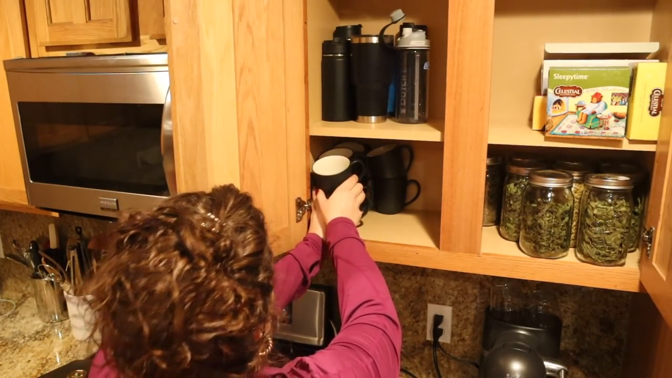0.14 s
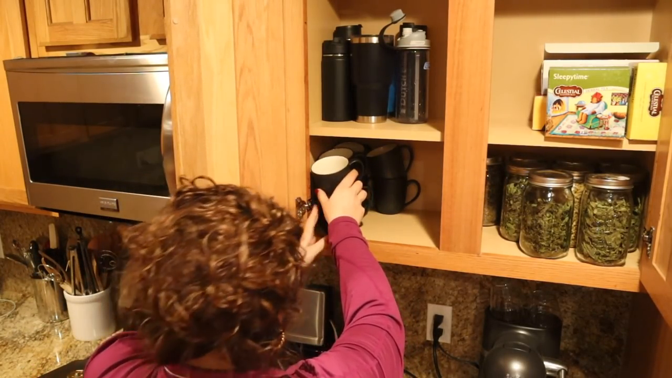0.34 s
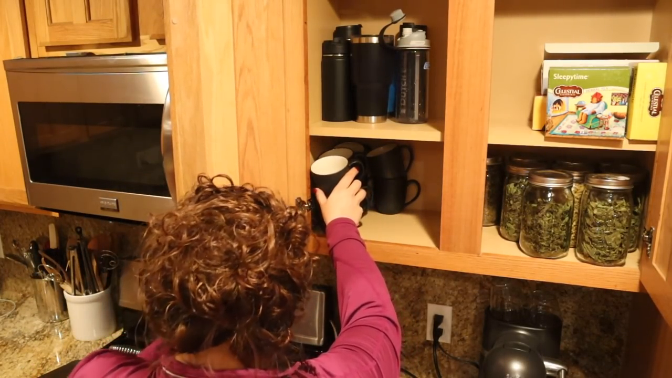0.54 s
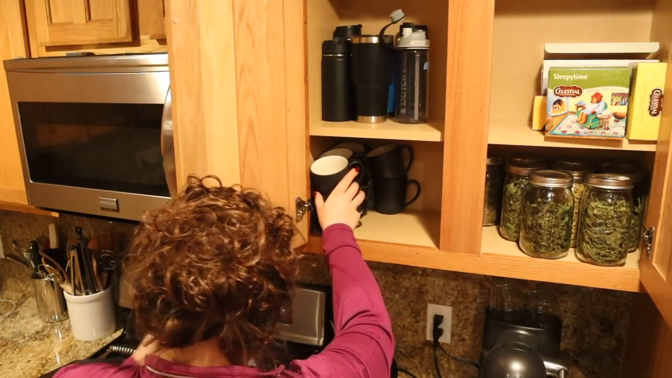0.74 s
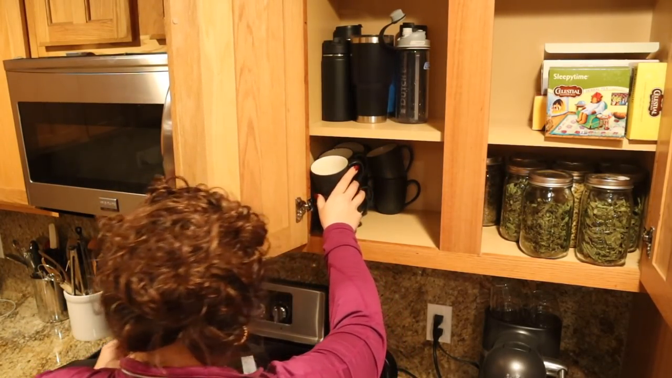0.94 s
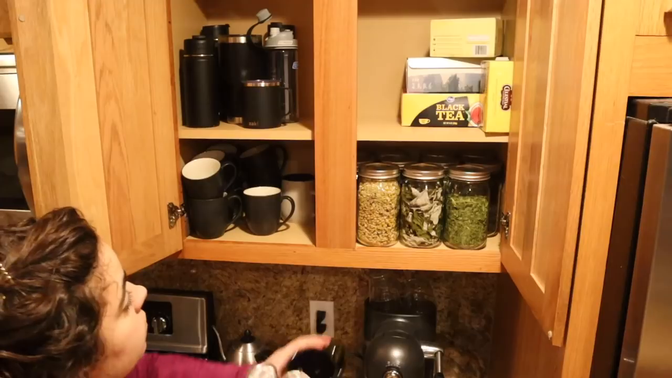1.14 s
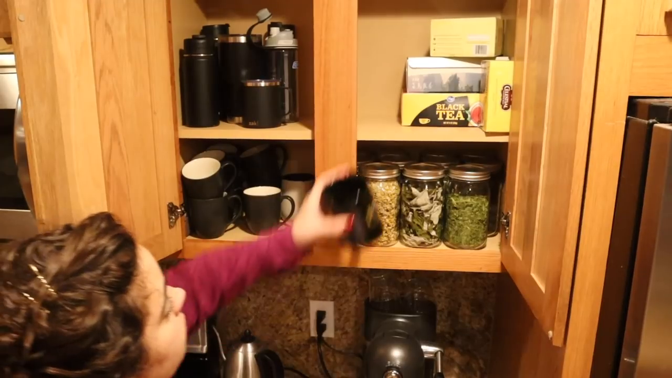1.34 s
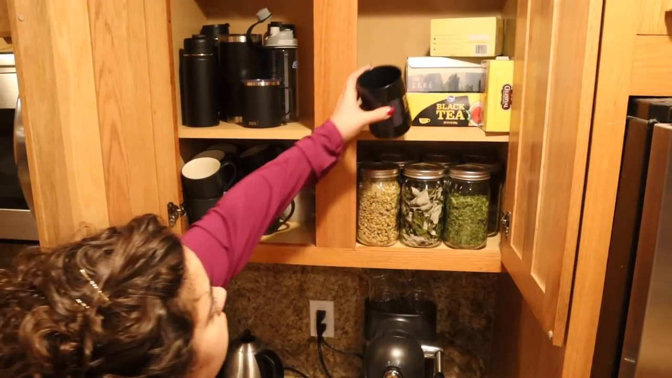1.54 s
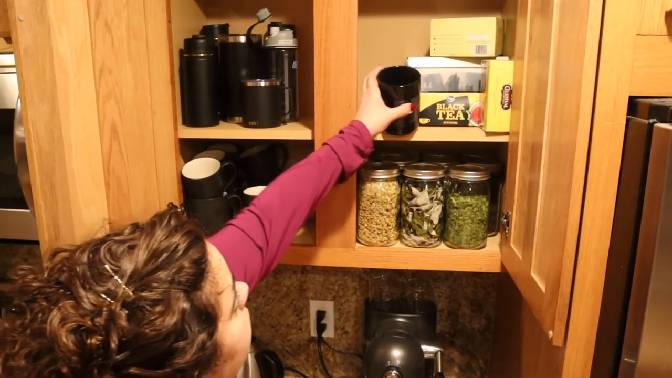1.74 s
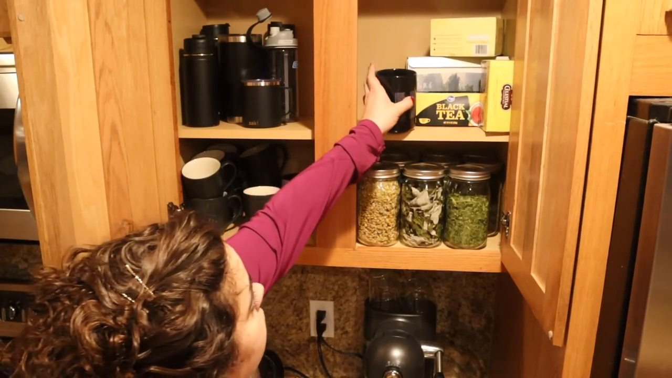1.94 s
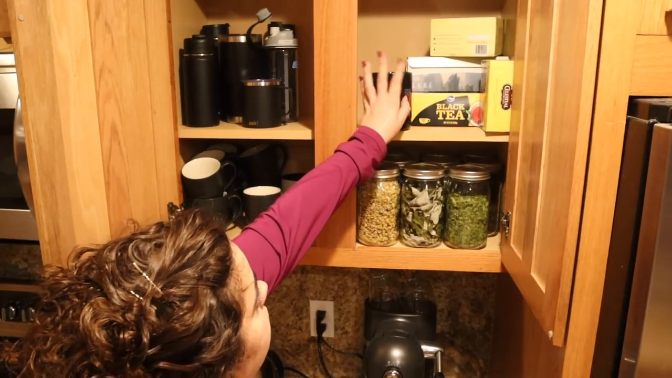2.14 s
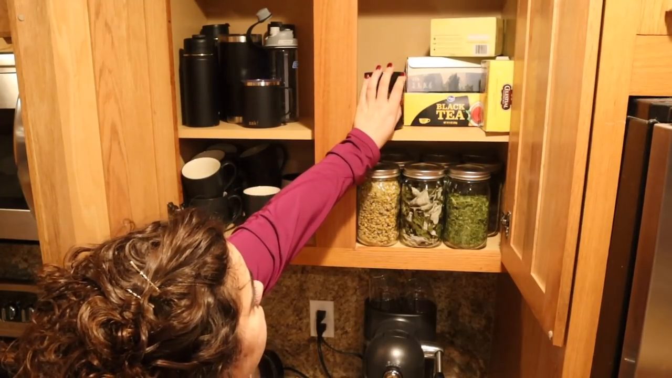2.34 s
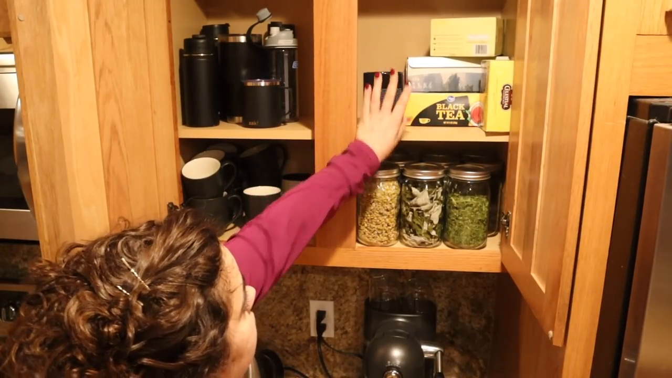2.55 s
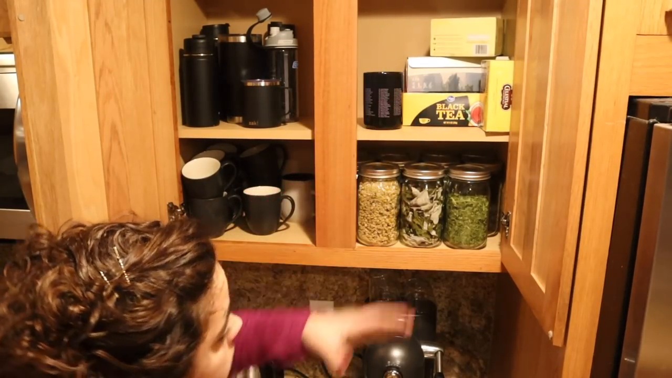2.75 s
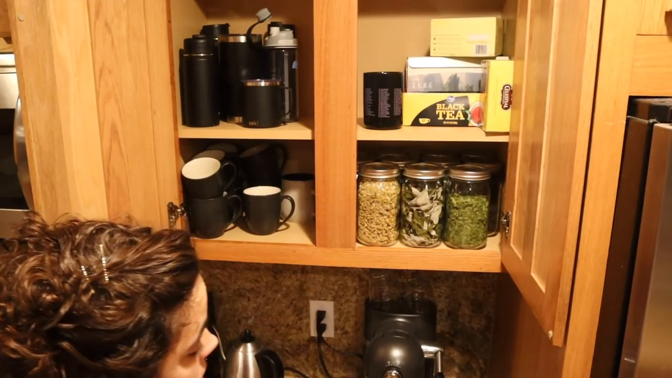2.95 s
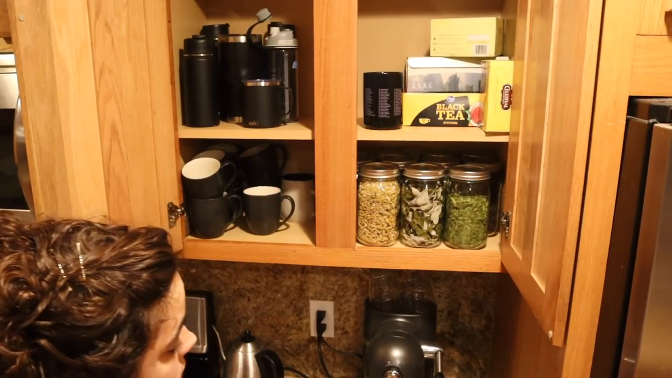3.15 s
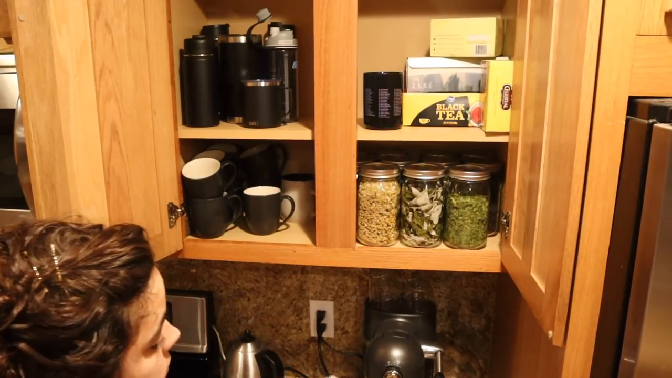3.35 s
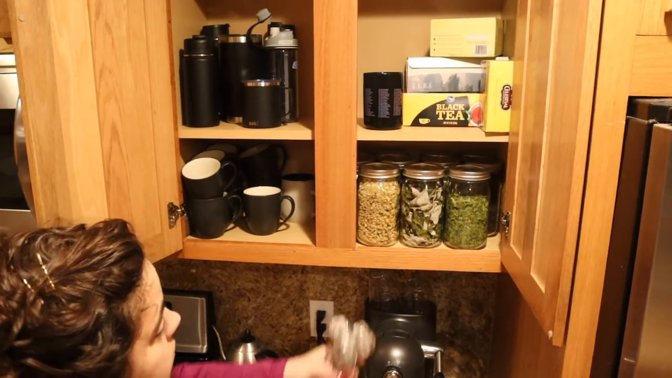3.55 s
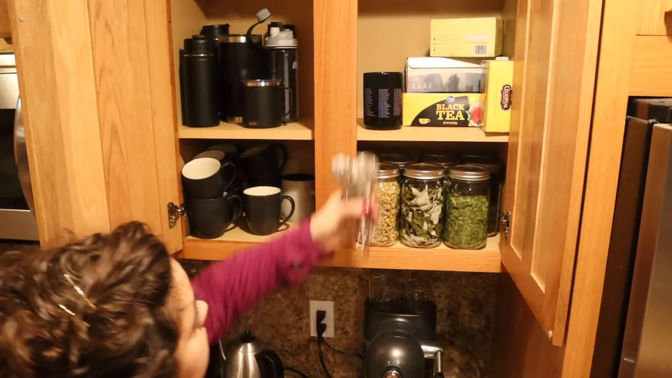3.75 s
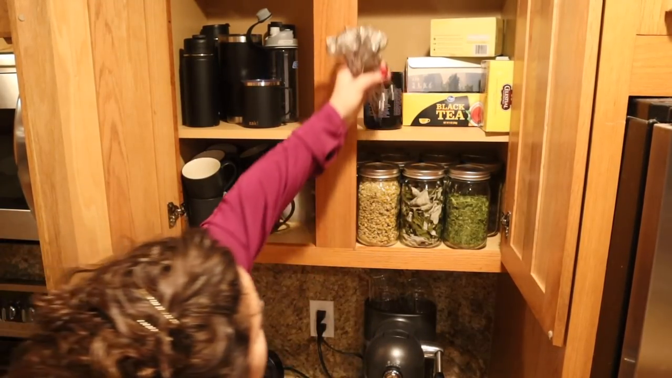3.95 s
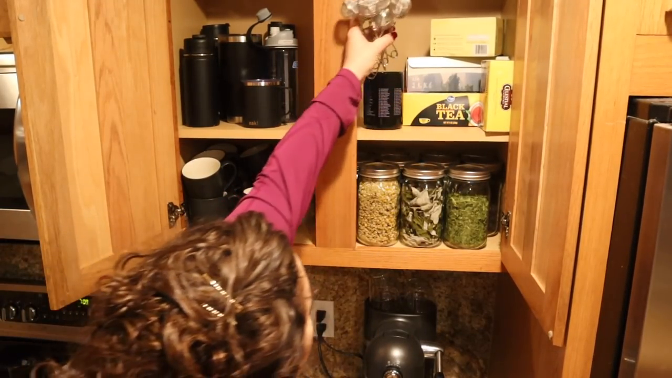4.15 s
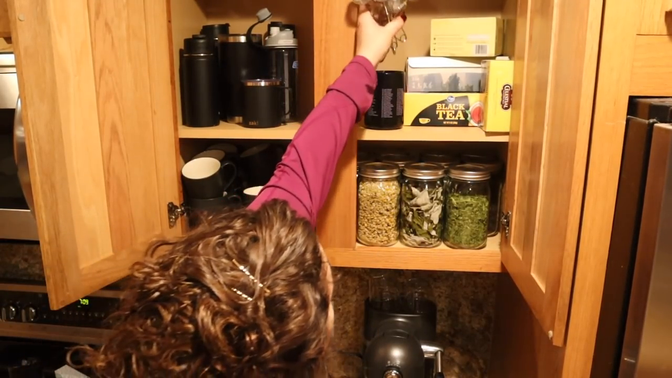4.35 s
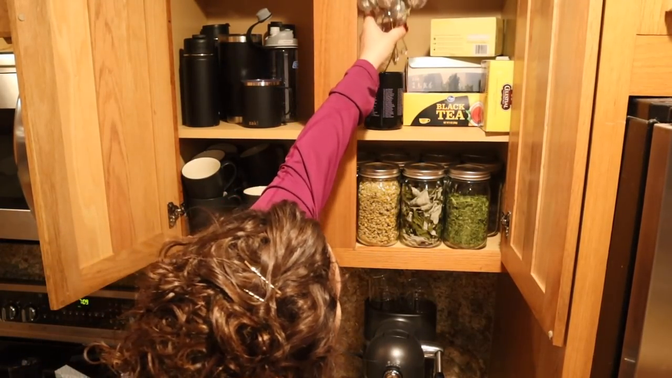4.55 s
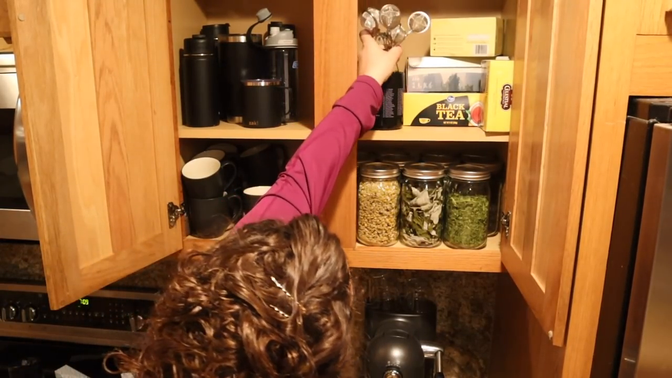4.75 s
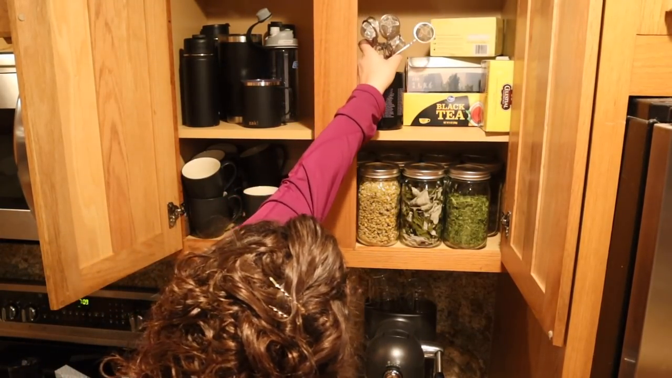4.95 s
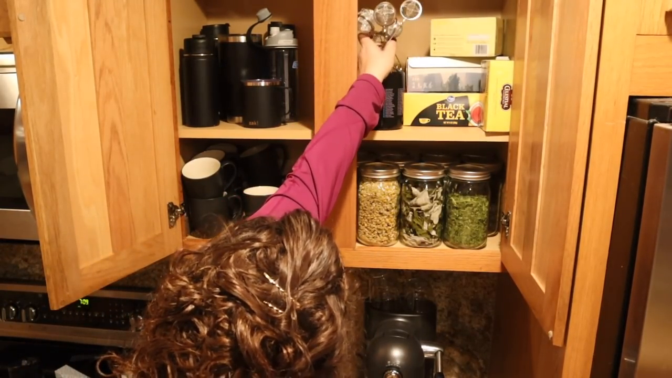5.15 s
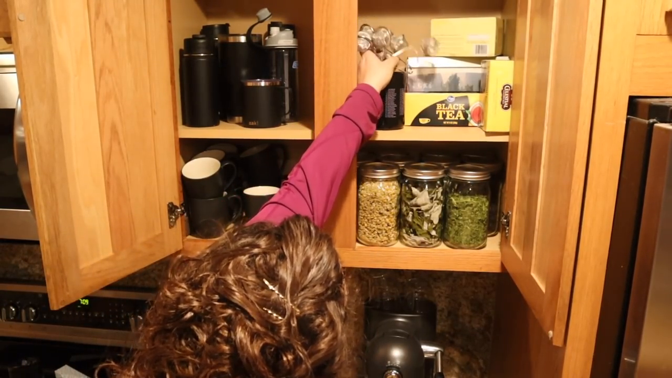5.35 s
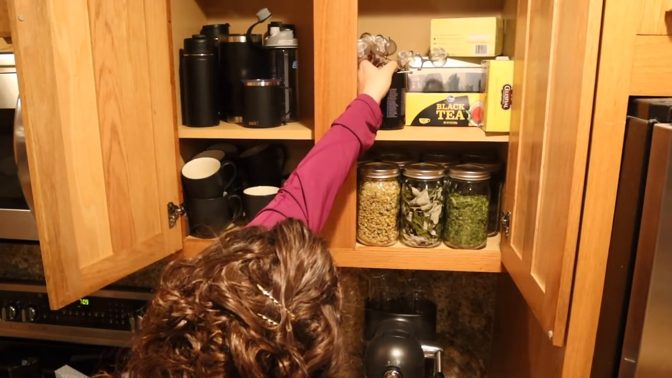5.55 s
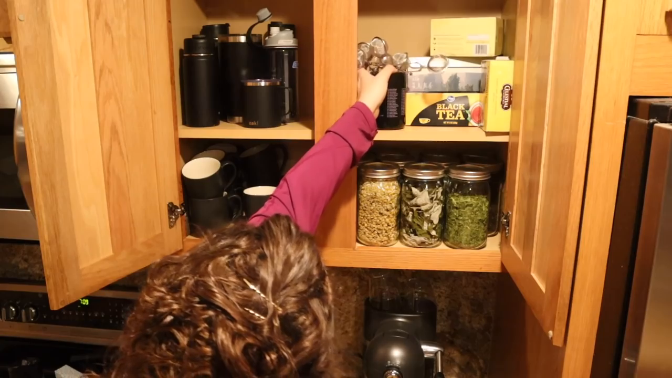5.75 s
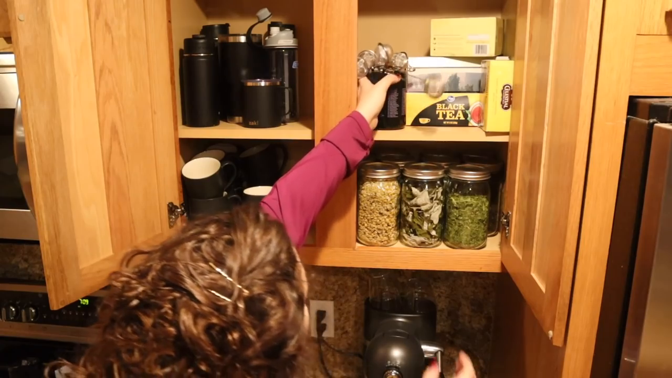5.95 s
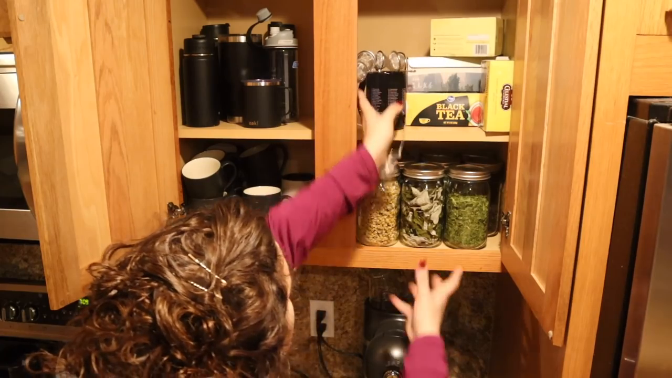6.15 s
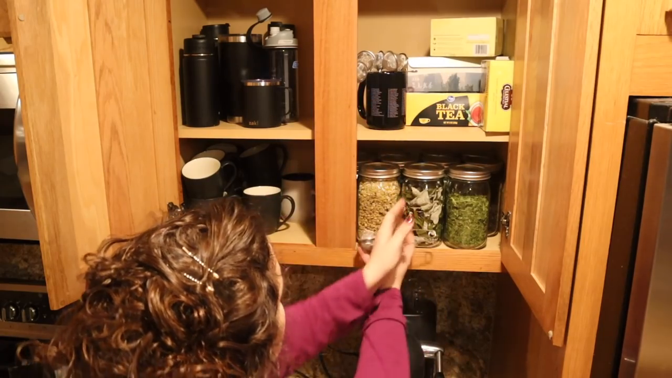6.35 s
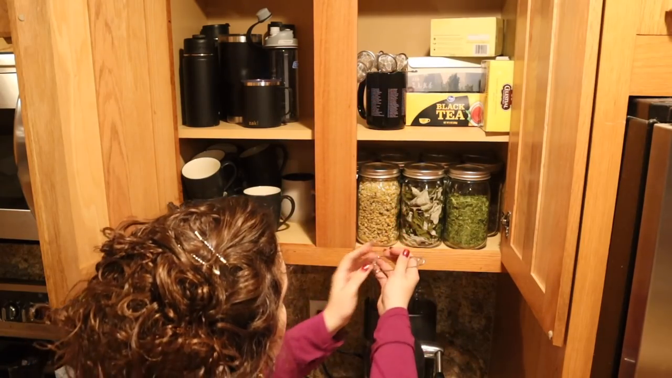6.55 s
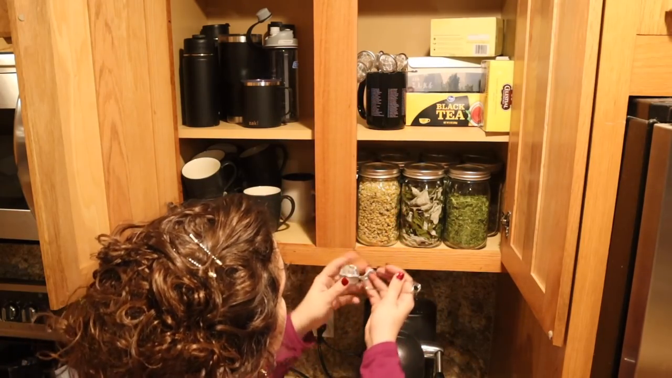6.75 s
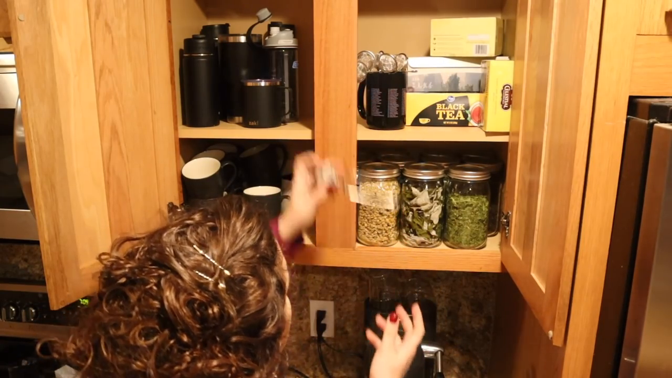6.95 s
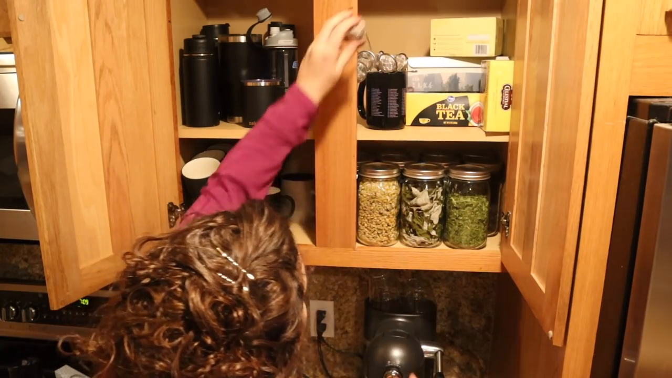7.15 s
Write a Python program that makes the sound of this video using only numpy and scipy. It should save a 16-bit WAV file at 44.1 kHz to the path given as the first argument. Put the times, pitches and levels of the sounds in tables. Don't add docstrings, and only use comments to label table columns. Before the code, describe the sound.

A close stereo pickup, cupboard slightly left, in a modest live kitchen with soft air noise and low wavering refrigerator hum throughout. From 0 to 0.25 s stoneware mugs tick, clash and grind rim on rim, ringing brightly; faint damped taps follow at 0.45-0.6. Near-quiet until a dull cloth sweep at 1.16 and light sleeve rustle. At 1.8 a cup knocks sharply on the wooden shelf, again hardest at 2.05, then slides with a scratchy rub around 2.3-2.4. Cloth rustles from 2.8, crisper around 3-3.2, then softly on. At 4.2 steel strainer handles drop hollowly into the cup, with strong paired wood knocks at 4.37 and 4.43. Sparse clinks from 4.75 grow into dense jingling, dragging and mesh brushing from 5.3, strongest around 6-6.2 with a bright clink and short scrape. Light ticks fade by 6.7, leaving slight rustle and hum to about 7.2.

```python
import sys
import numpy as np
from scipy import signal
from scipy.fft import rfft, irfft, next_fast_len
from scipy.io import wavfile

SR = 44100
rng = np.random.default_rng(int(sys.argv[2]) if len(sys.argv) > 2 else 0)


def elevation(decibels):
    levels = np.asarray(decibels, float)
    return 10 ** (levels / 20)


def to_wav(s):
    ch = np.atleast_2d(s).T
    pcm = np.round(np.clip(ch, -1, 1) * 32767)
    wavfile.write(sys.argv[1], SR, pcm.astype(np.int16))


N = 317520

# [t/s, level/dB]
SHUFFLING = [(4.19, -74), (4.7, -64), (4.846, -60), (5.2, -57.5), (5.36, -44), (5.866, -41.5),
             (6.138, -39.5), (6.5, -55.5), (6.6, -84)]
# [f/Hz, level/dB per Hz]
WOOD_CRACK = [(50, -51), (175, -17.5), (260, -4), (1000, 1), (1500, -3), (2000, -12.5), (3000, -17.5),
              (4000, -22), (5500, -34.5), (8500, -47), (15000, -92)]


def rms_one(x):
    return x / np.sqrt(np.mean(x ** 2) + 1e-20)


def gain_curve(rows):
    return elevation(np.interp(np.arange(N) / SR, *np.transpose(rows), -200, -200))


def swells(rows, rise_db_per_s, fall_db_per_s):
    t = np.arange(N) / SR
    db = np.full(N, -200.)
    for start, hold, top_db in rows:
        early = np.maximum(start - t, 0)
        late = np.maximum(t - start - hold, 0)
        db = np.maximum(db, top_db - rise_db_per_s * early - fall_db_per_s * late)
    return elevation(db)


def at_hz(points, hz):
    points = np.array(points)
    return np.interp(np.log(hz + 1), np.log(points[:, 0]), points[:, 1])


def body(spectrum, tilt_db=0, size=2048):
    hz = np.arange(size // 2 + 1) * SR / size
    db = at_hz(spectrum, hz) + tilt_db * np.log2((hz + 50) / 1500)
    cepstrum = irfft(np.log(elevation(db)))
    cepstrum[1:size // 2] *= 2
    cepstrum[size // 2 + 1:] = 0
    response = irfft(np.exp(rfft(cepstrum)))
    return response / np.sqrt(np.sum(response ** 2))


def ring(clicks, hz, t60):
    r = elevation(-60 / (np.clip(t60, 0.01, 0.8) * SR))
    w = 2 * np.pi * hz / SR
    return signal.lfilter([0, np.sin(w)], [1, -2 * r * np.cos(w), r * r], clicks + 1e-18)


def grains(per_s, spread_db):
    sizes = elevation(spread_db * np.minimum(rng.exponential(1, N), 5)) * rng.choice([-1, 1], N)
    return rms_one(sizes * (rng.random(N) < per_s / SR))


def rub(gain, spectrum, per_s, spread_db):
    return gain * signal.fftconvolve(grains(per_s, spread_db), body(spectrum))[:N]


def touching(hits, contact_ms):
    return [(s, db, tilt_db, contact_ms, hz, own_db) for s, db, tilt_db, hz, own_db in hits]


def tuned(hz, levels):
    return [(f, db, t60) for f, (db, t60) in zip(hz, levels)]


def twins(modes, detune_percent, twin_db):
    return modes + [(hz * (1 + detune_percent / 100), db + twin_db, t60) for hz, db, t60 in modes]


def strike(hits, rubbing, modes, crack, ring_db, crack_db, uneven_db, own_t60, longest, fade=0.11, size=2000):
    t = np.arange(size) / SR
    out = np.zeros(N + 3 * size)
    first = round(hits[0][0] * SR)
    last = min(round(hits[-1][0] * SR) + SR // 2, N)
    feeds = np.zeros((len(modes), last - first + size))
    hz, mode_db, t60 = np.transpose(modes)
    for s, db, tilt_db, contact_ms, own_hz, own_db in hits:
        at = round(s * SR)
        contact = np.clip(contact_ms, 1, 25) / 1000
        chatter = rng.standard_normal(size) * (1 - np.exp(-t / 0.00017)) * np.exp(-(t / contact) ** 3)
        soft = signal.lfilter(*signal.butter(1, 1400, fs=SR), chatter)
        chatter = soft + (chatter - soft) * np.exp(-t / contact * fade)
        chatter /= np.sqrt(np.sum(chatter ** 2))

        luck = np.abs(np.exp(2j * np.pi * np.append(hz, own_hz)[:, None] * t) @ chatter)
        luck = np.maximum(luck, 0.5)
        gains = elevation(db + tilt_db * np.log2(hz / 1500) + uneven_db * rng.standard_normal(len(hz)))
        feeds[:, at - first:at - first + size] += (gains / luck[:-1])[:, None] * chatter

        snap = elevation(crack_db) * signal.fftconvolve(chatter, body(crack, tilt_db))
        note = ring(np.pad(chatter, (0, len(snap) - size)), own_hz, own_t60)
        out[at:at + len(snap)] += elevation(db) * (snap + elevation(own_db) * note / luck[-1])
    for feed, f, g, d in zip(feeds, hz, mode_db, t60):
        drive = feed[:last - first] + rubbing[first:last]
        out[first:last] += elevation(ring_db + g) * ring(drive, f, min(d, longest))
    return out[:N]


def diffuse(x, size):
    # [f/Hz, likeness 0-1]
    likeness = [(60, 0.73), (300, 0.63), (700, 0.27), (1500, 0.15), (4000, 0.031)]
    alike = np.clip(at_hz(likeness, np.arange(size // 2 + 1) * SR / size), 0, 1)
    mid, side = rfft(x, size) * np.sqrt([1 + alike, 1 - alike]) / np.sqrt(2)
    return np.array([mid + side, mid - side])


def room_tone():
    # [t/s, level/dB]
    tone_levels = [(0.0, -53), (0.06, -59), (0.3, -58.5), (0.9, -57), (1.13, -56.5), (1.17, -53),
                   (4.2, -54), (5.6, -52.5), (7.2, -53.5)]
    # [f/Hz, level/dB per Hz]
    air_colour = [(12, -76), (20, -44), (60, -5), (86, -13.5), (120, -8.5), (147, -11), (205, -7.5),
                  (257, -11.5), (596, -18), (667, -17.5), (725, -19), (14200, -35), (16300, -29)]
    # [f/Hz, level/dB rms]
    hum_lines = [(59.6, -64.5), (118.4, -62), (204.6, -67.5), (463.0, -74.5), (597.5, -70.5)]
    air = diffuse(rng.standard_normal((2, N)), N)
    air = air * elevation(at_hz(air_colour, np.arange(N // 2 + 1) * SR / N))
    gain = gain_curve(tone_levels)
    out = elevation(0.5) * gain * rms_one(irfft(air, N))
    for hz, db in hum_lines:
        steady = np.sin(2 * np.pi * hz * np.arange(N) / SR)
        waver = rms_one(ring(rng.standard_normal(N), hz, 1.0))
        out += elevation(db + 57) * gain * rms_one(steady + 1.1 * waver)
    return out


def kitchen(x):
    # [f/Hz, t60/s]
    decays = [(125, 0.6), (250, 0.56), (500, 0.46), (1000, 0.72), (2000, 0.72), (4000, 0.67), (8000, 0.38),
              (13000, 0.17)]
    t = np.arange(SR // 2 + SR // 4) / SR
    tail = 0
    for hz, t60 in decays:
        edges_hz = [hz / np.sqrt(2), min(hz * np.sqrt(2), 19000)]
        band = signal.butter(2, edges_hz, "band", fs=SR, output="sos")
        decay = elevation(-60 * t / t60) + elevation(7.5 - 60 * t / 0.061)
        tail = tail + signal.sosfilt(band, rng.standard_normal((2, len(t)))) * decay
    tail = tail * (1 - np.exp(-(t / 0.0059) ** 2))
    tail = tail / np.sqrt(np.sum(tail ** 2) / 2)
    size = next_fast_len(N + len(t))
    return irfft(diffuse(tail, size) * rfft(x, size), size)[:, :N]


def ports(x, lead_samples):
    # [f/Hz, level/dB]
    port_tilt = [(300, -2), (1500, -1.6), (4000, -0.3), (8000, 1), (13000, 8)]
    hz = np.arange(N // 2 + 1) * SR / N
    tilt = elevation(at_hz(port_tilt, hz) / 2)
    late = np.exp(-2j * np.pi * lead_samples * hz / SR)
    return irfft(rfft(x) * np.array([tilt, late / tilt]), N)


def sleeve():
    # [t/s, hold/s, level/dB]
    rustles = [(1.3, 0.21, -63.5), (1.5, 0.011, -57), (1.6, 0.15, -62.5), (2.5, .01, -66),
               (2.78, 0.14, -65.5), (2.955, 0.0037, -49.5), (3.03, 0.17, -55), (3.18, 0.0041, -46),
               (3.24, 0.02, -52.5), (3.37, 0.99, -66), (3.95, 0.19, -64), (6.55, 0.0081, -62),
               (6.69, .005, -67), (6.85, 0.42, -69.5)]
    # [t/s, hold/s, level/dB]
    reach = [
        (1.158, 0.056, -43),
    ]
    # [f/Hz, level/dB per Hz]
    cloth_colour = [(700, -9), (1700, -14), (3300, -3), (5500, -2), (9000, -5.5), (13000, -10),
                    (16000, -11.5)]
    cloth = rub(1, cloth_colour, 6000, 2.4)
    thick = signal.lfilter(*signal.butter(2, 4450, fs=SR), cloth)
    rise_db_per_s, fall_db_per_s = 502, 207
    light = swells(rustles, rise_db_per_s, fall_db_per_s)
    heavy = swells(reach, rise_db_per_s, fall_db_per_s)
    return light * cloth + heavy * thick


def shelf():
    # [t/s, peak level/dB, tilt/dB per octave, knocking thing's f/Hz, its share/dB]
    knock_hits = [(0.064, -13, 1, 728, 1), (0.56, -50.5, -7.5, 280, -9), (1.802, -13.5, 5, 348.5, -3),
                  (1.811, -11.5, -1, 595, -2), (1.819, -21, -4, 770, -1.5), (1.903, -20, -4, 612, -1),
                  (1.965, -38.5, -9, 280, -3), (2.049, -6, 1.5, 1006, -6.5), (2.142, -30.5, 0, 293, 6),
                  (2.062, -20.5, 2, 990, -1), (4.365, -10.5, 1, 288, -9), (4.374, -13.5, -0.5, 592, -4.5),
                  (4.428, -8.5, 1, 289, -5.5), (4.436, -11, -0.5, 589, -2), (5.2, -47.5, -2.5, 690, 4),
                  (5.468, -38.5, -5, 1010, -3), (5.584, -38.5, -6.5, 640, 4), (5.761, -34, 0, 278, 4),
                  (6.009, -32, 3.5, 610, -32), (6.168, -28.5, 6, 765, 1), (6.435, -41.5, -5, 267, 2),
                  (6.688, -46.5, 9, 900, -2.5)]
    drop_hits = [
        (4.2005, -19.5, 2.2, 2100, -13),
        (4.2045, -20.5, 0.51, 834, -0.5),
    ]
    # [f/Hz, level/dB, t60/s]
    box_modes = [(110, -14.5, 0.067), (293, -1, 0.18), (378, -3, 0.063), (471, -9, 0.18), (584, -2, 0.3),
                 (770, -20, 0.13), (776, -0.5, 0.17), (890, -7, 0.11), (980, -34, 0.093), (1025, -10, 0.13),
                 (1070, -22, 0.11), (1220, -8.5, 0.14), (1330, -4, 0.2), (1460, -7, 0.16),
                 (1646, -14, 0.17)]
    # [f/Hz, level/dB, t60/s]
    hollow_modes = [(801, -12, 0.1), (1130, -2, 0.068), (1614, 5, 0.033), (2100, 2, 0.017),
                    (2830, -15, 0.035), (3384, -6.5, .03)]
    # [t/s, hold/s, level/dB]
    slides = [(2.1, 0.0088, -38), (2.29, 0.1, -44.5), (2.5, 0.018, -59), (6.168, 0.07, -41.5),
              (6.5, 0.018, -50.5)]
    # [t/s, hold/s, level/dB]
    pushes = [
        (2.288, 0.1, -43),
        (2.5, 0.011, -57),
    ]
    # [t/s, hold/s, level/dB]
    rocks = [(1.825, 0.017, -47), (1.91, 0.0063, -56), (2.065, 0.0092, -44), (4.385, 0.0067, -45.5),
             (4.45, 0.02, -41.5)]
    # [f/Hz, level/dB per Hz]
    scratch = [(590, -26), (1000, -9), (1370, -4), (1950, -2), (3010, -11), (12000, -36), (15600, -79),
               (22000, -120)]
    rise_db_per_s = 648.5
    sliding = swells(slides, rise_db_per_s, 162) + elevation(-7.5) * gain_curve(SHUFFLING)
    knocks = strike(touching(knock_hits, 11.3), elevation(-14.5) * sliding * grains(1300, 5.8), box_modes, WOOD_CRACK,
                    ring_db=-13.0, crack_db=19.5, uneven_db=4.0, own_t60=0.079, fade=0.43, longest=0.075)
    dull = rub(elevation(-2.5) * sliding, WOOD_CRACK, 2500, 5.2)
    rocking = rub(swells(rocks, rise_db_per_s, 216), scratch, 3000, 3.8)
    drop = strike(touching(drop_hits, 7.5), np.zeros(N), hollow_modes, scratch,
                  ring_db=-5.5, crack_db=14.5, own_t60=0.032, uneven_db=-1.0, longest=0.1)
    scratching = rub(elevation(-3.5) * swells(pushes, rise_db_per_s, 349.5), scratch, 2200, 1.6)
    return knocks + dull + rocking + drop + scratching


def strainers():
    # [t/s, peak level/dB, tilt/dB per octave, loudest note f/Hz, its share/dB]
    clink_hits = [(4.75, -34.5, 0.5, 2640, -11), (4.8542, -25, -3, 2338, -6),
                  (5.1085, -25.5, -0.5, 2550, -6.5), (5.1957, -35, 1.5, 7900, 1.5),
                  (5.312, -47, 6, 4170, -12), (5.3262, -19.5, -2.5, 2480, -5.5), (5.335, -30, 0, 6960, -6),
                  (5.347, -37, -6, 2545, -7), (5.3706, -25.5, 0, 8000, -7.5), (5.5844, -30.5, 2, 6940, -11),
                  (5.6898, -29.5, -4, 2547, -10), (5.7474, -21, -5, 2550, -25), (5.8292, -37, 5, 2520, -22),
                  (5.881, -44, -20, 2450, -7), (5.9234, -34.5, 2.5, 2560, -2.5),
                  (5.9559, -32, 0.5, 4200, -5), (6.1358, -25.5, -1, 4170, -10),
                  (6.1673, -12.5, 1, 2593, -2.5), (6.2274, -25.5, 2.5, 9770, -4),
                  (6.4205, -27.5, -3, 6078, -9), (6.5099, -37.5, -1, 5200, -11),
                  (6.529, -42, 0.5, 4200, -5), (6.6842, -50, 2.5, 3380, -5)]
    clatter_hits = [(4.1753, -19.5, 2.5, 11080, -13), (4.2755, -25.5, -0.5, 5140, -5.5),
                    (4.816, -44.5, 6, 2640, 0), (5.057, -45, -5, 3280, -2), (5.0955, -24, -2.5, 5133, -18),
                    (5.4235, -32.5, -2, 5950, -6), (5.44, -29.5, -2.5, 2460, -4),
                    (5.5278, -57, -6, 2570, -12), (5.5511, -26, -4, 7930, -0.5),
                    (5.6019, -25.5, -2, 2400, -29), (5.6579, -35, 0, 2430, -3),
                    (5.9789, -18.5, 0.5, 7810, -5), (6.0625, -15.5, 1, 6078, -16),
                    (6.1075, -18.5, -1.5, 2505, -6)]
    steel_hz = [2440, 2545, 2750, 3320, 4170, 4720, 5133, 3730, 6078, 6490, 6860, 6960, 7508, 7620, 7905,
                9600, 9850, 10340, 11080, 11700, 12320, 12710, 13280, 14010, 14820, 15280]
    # [level/dB, t60/s]
    steel_levels = [(-9, 0.29), (-4, 0.14), (-27, 0.17), (-8.5, 0.27), (-6.5, 0.16), (-16.5, .1), (-8, 0.2),
                    (-13, 0.097), (-9, .14), (-24, 0.11), (-11, 0.071), (-8, 0.28), (-2, 0.087), (-12, .08),
                    (-1.5, 0.056), (-7.5, .09), (-6.5, 0.066), (-11.5, 0.046), (-9.5, 0.037), (-30, 0.074),
                    (-9, 0.058), (-28, .1), (-18, .06), (-22, .06), (-23, .08), (-11, .06)]
    # [f/Hz, level/dB per Hz]
    steel_crack = [(500, -61), (1500, -1.5), (2500, 12), (4000, 9), (7000, 15), (8600, 7.5), (10000, 9.5),
                   (12000, 0), (14000, -3), (16000, -25)]
    # [t/s, hold/s, level/dB]
    drags = [(4.758, 0.007, -46), (4.86, 0.0034, -42.5), (5.1, 0.011, -34.5), (5.328, 0.059, -35.5),
             (5.41, 0.058, -44), (5.548, 0.19, -38), (5.764, 0.004, -24.5), (5.83, 0.15, -44),
             (5.99, 0.016, -30), (6.06, 0.045, -33), (6.17, 0.0045, -36), (6.25, 0.038, -55)]
    # [f/Hz, level/dB, t60/s]
    cup_modes = [(2450, -18, 0.14), (2517, 23, 0.073), (2640, 9, 0.13), (2640, 2, 0.097)]
    # [t/s, hold/s, level/dB]
    brushes = [(5.31, 0.098, -50), (5.425, 0.042, -38.5), (5.53, 0.12, -47), (5.68, .02, -48),
               (5.75, 0.033, -44), (5.83, 0.018, -65), (5.92, .05, -58), (6.19, 0.067, -48),
               (6.49, 0.032, -49)]
    # [f/Hz, level/dB per Hz]
    mesh_colour = [(2000, -25), (5000, -3), (8000, -6), (11000, -3), (14000, -8), (16000, 1.5)]
    shuffle = gain_curve(SHUFFLING)
    hits = sorted(touching(clink_hits, 6.2) + touching(clatter_hits, 13.2))
    modes = twins(tuned(steel_hz, steel_levels), -0.55, twin_db=-8.0)
    clinks = strike(hits, elevation(-19.5) * shuffle * grains(170, 4.0), modes, steel_crack,
                    ring_db=-13.5, crack_db=15.5, uneven_db=2.5, own_t60=0.097, longest=0.26)
    stick_slip = grains(540, 0.84)
    song = rms_one(sum(elevation(db) * ring(stick_slip, hz, t60) for hz, db, t60 in cup_modes))
    dragging = swells(drags, 598, 268)
    mesh = rub(swells(brushes, 500, 122), mesh_colour, 5000, 3.8)
    jingle = rub(elevation(-12) * shuffle, steel_crack, 2000, 1.3)
    return clinks + mesh + jingle + elevation(-7.5) * dragging * song


def mugs():
    # [t/s, peak level/dB, tilt/dB per octave, loudest note f/Hz, its share/dB]
    rim_hits = [
        (0.0648, -16, -0.5, 2474, -10),
        (0.1275, -19, 3, 2400, -10),
    ]
    rim_ticks = [(0.0004, -19.5, -1.7, 2720, -3), (0.152, -19.5, 0.24, 3710, -5),
                 (0.165, -26, 0.5, 5600, 6), (0.2242, -35, -1.8, 8930, -8)]
    tap_hits = [
        (.4495, -40, -7, 477, 5),
        (.5118, -37, -1, 1460, -1),
        (.6016, -35, 3.5, 750, -1.5),
    ]
    # [t/s, level/dB]
    grind = [(0.0, -26), (0.056, -41), (0.068, -27), (0.108, -32.5), (0.156, -25), (0.2, -32.5),
             (0.418, -49.5), (0.6, -63), (0.7, -88)]
    mug_hz = [697, 790, 1201, 1690, 2400, 2470, 2560, 2690, 2915, 3180, 3660, 3625, 3780, 3920, 4310, 4430,
              5470, 5630, 5590, 5800, 7040, 6840, 7250, 6570, 8930, 8620, 10300, 13700, 14900]
    # [level/dB, t60/s]
    mug_levels = [(-10, .49), (1.5, 0.058), (-18, .5), (-31, .15), (-8, 0.48), (-3, 0.3), (3.5, 0.21),
                  (-2.5, 0.33), (-7.5, 0.34), (-14, 0.17), (-8.5, 0.25), (-2, 0.39), (-9, 0.4), (-7, 0.31),
                  (-16, .25), (-12, 0.34), (-5, 0.36), (-13, .33), (-10, 0.5), (-26, .4), (-16, 0.41),
                  (-12, 0.32), (-12, 0.26), (-32, 0.27), (-16.5, .37), (-37, .17), (-37, 0.13), (-24, .2),
                  (-38, .15)]
    # [f/Hz, level/dB per Hz]
    mug_crack = [(90, -31), (200, -6.5), (700, -3), (1500, -1.5), (2000, -7), (3000, 0), (5500, -16.5),
                 (7300, -4.5), (7900, -48), (15000, -57)]
    # [f/Hz, level/dB, t60/s]
    held_modes = [(718, -18, 0.078), (834, -8, 0.12), (1606, -7, 0.055), (2430, -7.5, 0.048),
                  (3170, -6.5, 0.077), (3710, -13, 0.091), (3830, -20, .07), (5560, -34, 0.06)]
    pressure = gain_curve(grind)
    rubbing = elevation(-30 - 3.5) * pressure ** 0.77 * grains(900, spread_db=5)
    hits = sorted(touching(rim_hits, 28) + touching(rim_ticks, 6.6))
    modes = twins(tuned(mug_hz, mug_levels), 0.586, twin_db=-0.5)
    rings = strike(hits, rubbing, modes, mug_crack,
                   ring_db=-18.0, crack_db=-5.0, uneven_db=5.0, own_t60=0.11, longest=0.4)
    taps = strike(touching(tap_hits, 8.2), np.zeros(N), held_modes, WOOD_CRACK,
                  ring_db=-5, crack_db=13, uneven_db=3.0, own_t60=0.06, longest=0.1)
    return rings + taps + rub(elevation(-1.5) * pressure, mug_crack, 3000, 4.1)


def scene():
    near = mugs() + shelf() + strainers()
    near = signal.sosfilt(signal.butter(4, 118, "high", fs=SR, output="sos"), near)
    arm = sleeve()
    direct = ports(near, lead_samples=1.59) + ports(arm, lead_samples=1)
    return direct + elevation(-9.0) * kitchen(near + arm) + room_tone()


def band_limit(x):
    return signal.sosfilt(signal.butter(12, 16470, fs=SR, output="sos"), x)


def record(dry):
    rounded = 0.85 * np.tanh(dry / 1.062)
    top_cut = signal.cheby2(12, 60, 16450, fs=SR, output="sos")
    return band_limit(signal.sosfilt(top_cut, rounded))


dry = scene()
out = record(dry)
to_wav(out)
```